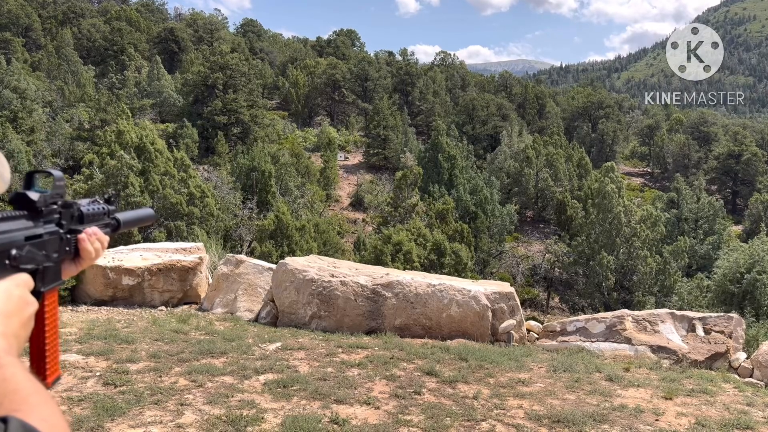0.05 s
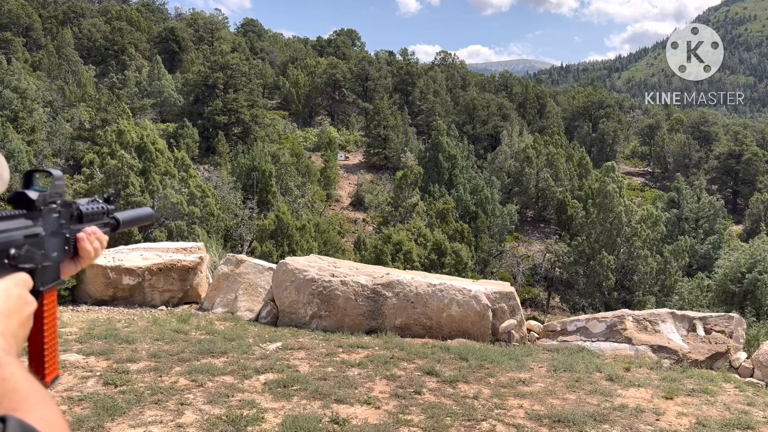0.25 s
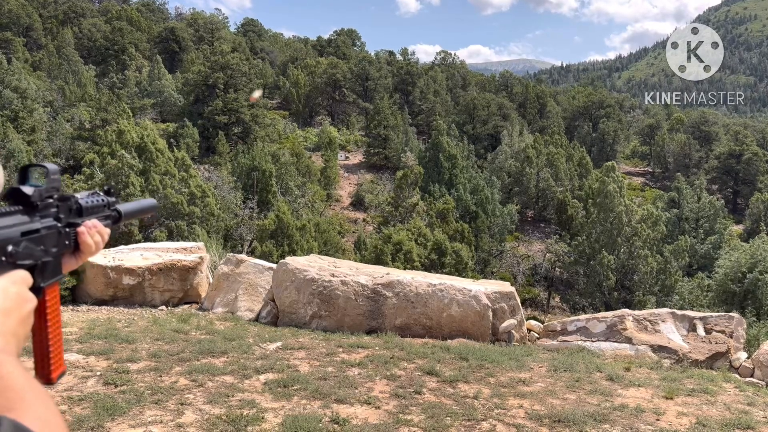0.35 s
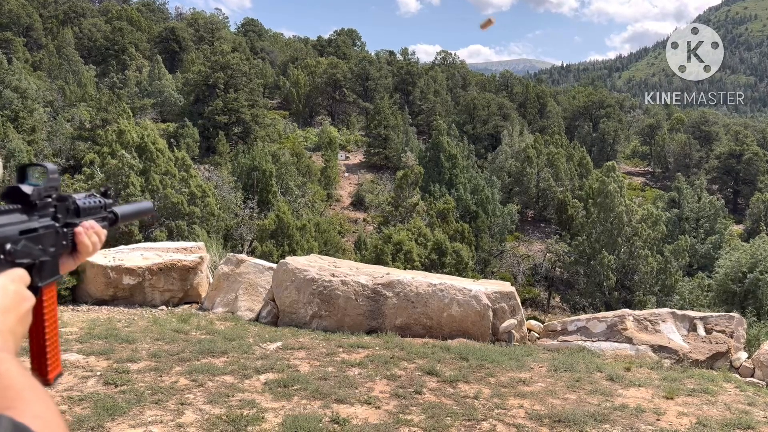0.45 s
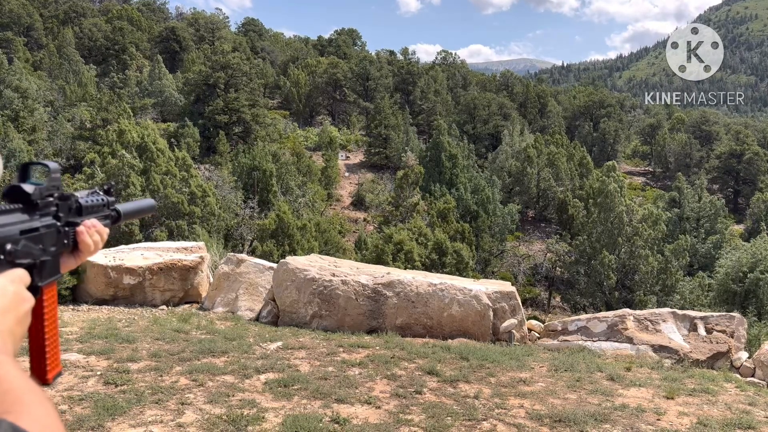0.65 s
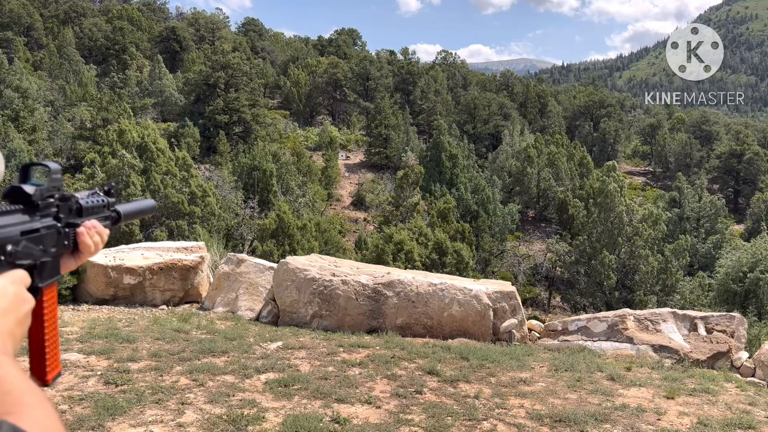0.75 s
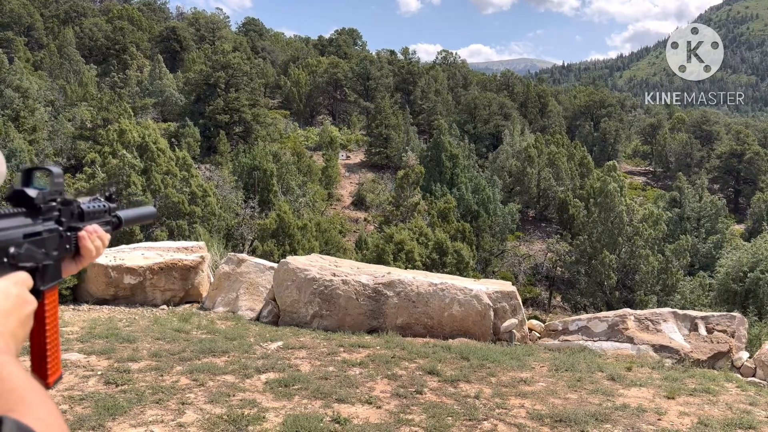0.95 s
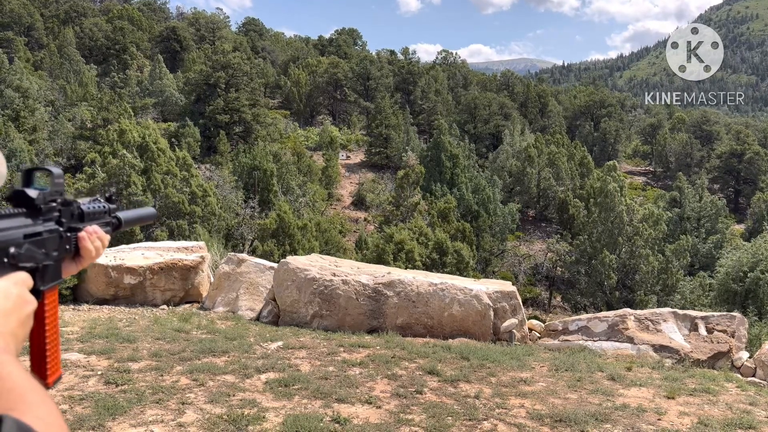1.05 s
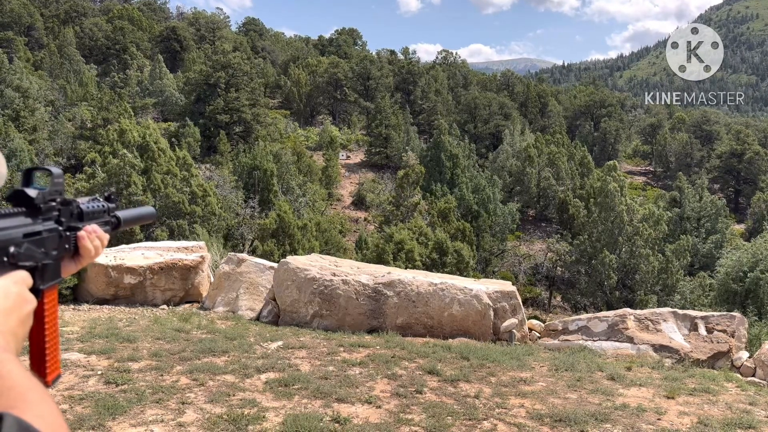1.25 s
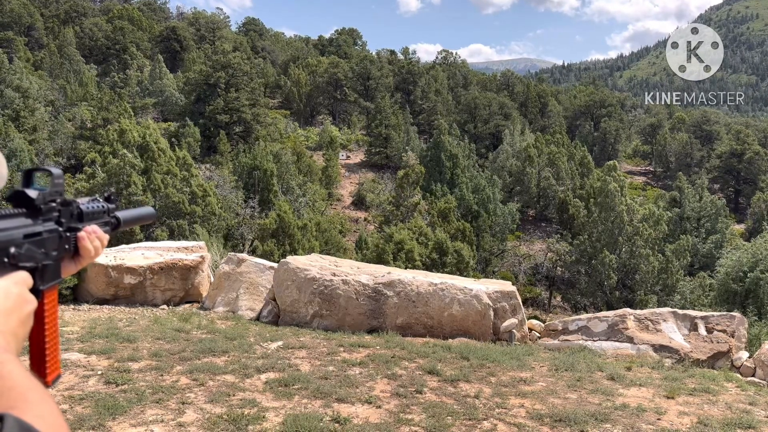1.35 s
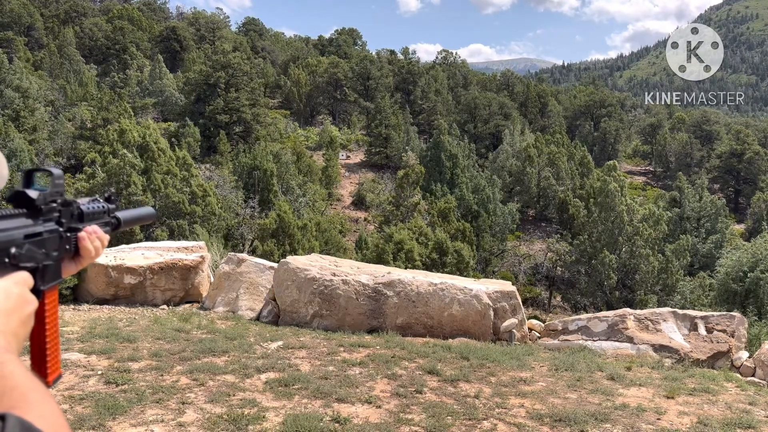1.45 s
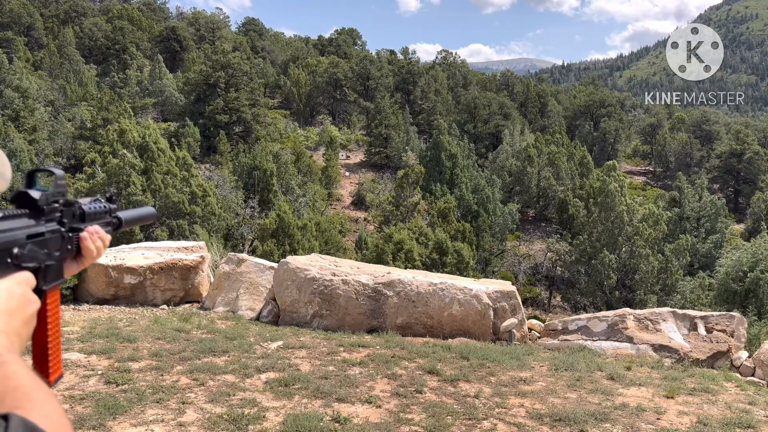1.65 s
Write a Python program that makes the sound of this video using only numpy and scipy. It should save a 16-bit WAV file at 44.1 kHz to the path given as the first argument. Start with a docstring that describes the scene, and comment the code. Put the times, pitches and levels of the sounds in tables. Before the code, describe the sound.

A suppressed carbine fires once close to the microphone, a short muffled crack with bolt clatter and low thump; a soft echo fades, a dull knock follows, the case faintly tinkles, then the action clicks sharply.

```python
"""Wind buffets the microphone, then a suppressed carbine fires one shot on an open range facing a wooded slope.
The report, a shaped noise burst with venting gas, is wrapped in the action's clatter: cracks plus ringing modes.
Sine puffs that sink in pitch thump the microphone; ground, slope and valley answer with decaying diffuse noise.
Dull knocks follow; the spent case bounces and tinkles as two beating modes, and the action gives a sharp click.
Air noise, rustling trees and a faint hiss of insects continue beneath."""
import sys
import numpy as np
from scipy import signal
from scipy.fft import rfft, irfft
from scipy.io import wavfile
from scipy.ndimage import uniform_filter1d

SR = 44100
rng = np.random.default_rng(int(sys.argv[2]) if len(sys.argv) > 2 else 0)


def materialize(psi):
    """Save the field psi as 16-bit PCM at rate SR to the path in sys.argv[1].

    A 1-D psi becomes a single channel; in a 2-D psi each row is a channel.
    """
    bounded = np.clip(np.atleast_2d(psi).T, -1, 1)
    quanta = np.round(bounded * 32767).astype(np.int16)
    wavfile.write(sys.argv[1], SR, quanta)


N = 74970   # length in samples

# Every *_SPECTRUM gives the relative spectral level of a noise. Columns: f/Hz, level/dB
# Every *_MODES lists resonances. Columns: f/Hz, relative level/dB, T60/s

# Gusts on the microphone. Columns: peak t/s, half length/s, level/dB, upper edge f/Hz
GUSTS = [(.024, .012, -33, 310), (.082, .014, -30, 230), (.122, .022, -37, 250), (.194, .007, -39, 290),
         (.46, .03, -41, 75), (.535, .035, -35, 72), (.626, .006, -47, 250), (.644, .012, -31, 110),
         (.674, .012, -40, 175), (.772, .014, -35, 235), (.8, .022, -29, 145), (1.0, .035, -44, 120),
         (1.077, .01, -27.5, 165), (1.145, .012, -46, 150), (1.235, .04, -43, 115), (1.35, .04, -49, 100),
         (1.53, .012, -45, 100), (1.59, .025, -47, 100)]
# Steady air. Columns: f/Hz, level/dB
AIR_SPECTRUM = [(15, -35), (25, -5), (54, 0), (88, -1), (121, -6), (219, -23), (558, -28), (1420, -39),
                (2020, -41), (2780, -54), (3930, -57), (4620, -52), (15000, -76)]
# Rustle of the trees. Columns: f/Hz, level/dB
TREES_SPECTRUM = [(300, 0), (600, -1), (1200, -7), (2000, -12), (2800, -26), (8000, -46), (15000, -50)]

# Echoes of ground and rocks nearby, of the slope, and of the valley.
# Columns: delay after the shot/s, level/dB, rise/s, hold/s, T60 in the bass/s
NEAR_ECHO = (.012, -45.5, .02, .02, .46)
SLOPE_ECHO = (.14, -54.5, .15, .025, .52)
FAR_ECHO = (.32, -64, .06, .06, 1.6)
# Nearby echo of the click. Columns: delay after the click/s, level/dB, rise/s, hold/s, T60 in the bass/s
CLICK_ECHO = (.004, -55, .004, .035, .31)
# Colours of the four echoes. Columns: f/Hz, level/dB
NEAR_SPECTRUM = [(290, -44), (500, -14), (704, -13), (949, -8), (1390, -13), (2290, -6), (3370, -15),
                 (5010, -1), (5780, -9), (8610, -16), (9930, -25), (10800, -20), (15000, -24)]
SLOPE_SPECTRUM = [(290, -60), (500, -30), (585, -10), (896, 0), (1050, -13), (1990, -8), (2390, -11),
                  (5160, -9), (8990, -29), (9380, -49), (10800, -25), (15000, -31)]
FAR_SPECTRUM = [(410, -42), (700, -12), (882, 0), (1080, -15), (1230, -5), (1780, -17), (2000, -6),
                (2590, -14), (5110, -15), (7130, -38), (15000, -60)]
CLICK_ECHO_SPECTRUM = [(350, -43), (600, -13), (863, -14), (961, 0), (1280, -20), (2340, -8), (2570, -17),
                       (2820, -13), (7860, -22), (15000, -34)]

# Dull knocks, likely the bullet striking downrange. Columns: t/s, level/dB, T60/s
KNOCKS = [(.3843, -53, .02), (.5528, -36, .022), (.6075, -54, .02)]
# Colour of the knocks. Columns: f/Hz, level/dB
KNOCK_SPECTRUM = [(210, -30), (350, 0), (1770, -6), (2580, -16), (4610, -11), (6220, -30), (7630, -23),
                  (12400, -45), (15000, -30)]
# The case bouncing on the ground. Columns: t/s, level/dB, T60/s
BOUNCES = [(1.1365, -50.5, .022), (1.1405, -53, .02), (1.513, -58, .016), (1.5184, -59, .018)]
# Colour of the bounces. Columns: f/Hz, level/dB
BOUNCE_SPECTRUM = [(400, 0), (1200, -5), (2100, 4), (3100, -19), (4500, -10), (6000, -24), (10000, -22),
                   (12000, -11), (14000, -6), (15500, -14)]
# Touches that make the brass case ring. Columns: t/s, level/dB
CASE_TOUCHES = [(1.1398, -47), (1.5404, -60.5)]
# Modes of the case. Columns: f/Hz, level/dB, T60/s
CASE_MODES = [(11650, -4, .25), (11740, 0, .23)]

# Click of the action and its rebounds. Columns: t/s, crack level/dB, crack T60/s, ring level/dB
CLICKS = [(1.3333, -22, .01, -42), (1.3343, -22, .008, -26), (1.3402, -37, .016, -41),
          (1.3725, -51, .03, -57), (1.389, -64, .03, -57)]
# Colour of the click's cracks. Columns: f/Hz, level/dB
CLICK_SPECTRUM = [(700, -18), (1400, -15), (2100, -2), (2900, -11), (3600, 1), (4500, 1), (6100, -12),
                  (7800, -4), (10700, -8), (12300, -22), (13600, -8), (15500, -21)]
# Modes of the click. Columns: f/Hz, level/dB, T60/s
CLICK_MODES = [(738, -13, .05), (982, 2, .065), (1926, -6, .035), (2396, -9, .1), (3200, -40, .7),
               (3500, 5, .014), (4400, 7, .012), (7790, -5, .035), (8130, -4, .035), (10416, -13, .045),
               (14400, -12, .025)]

# Puffs of air. Columns: t/s, level/dB, start f/Hz, end f/Hz, glide/s, rise/s, hold/s, T60/s
PUFFS = [(.235, -18, 330, 120, .012, .004, .005, .035), (.2495, -9, 70, 50, .02, .012, .008, .09),
         (.2568, -24, 560, 170, .005, .001, .002, .025), (.3235, -16, 52, 46.5, .015, .02, .036, .06),
         (.3845, -15.5, 470, 48, .005, .003, .014, .06)]

# Steel on steel: hammer, unlocking, rear stop, bolt closing, bolt settling.
# Columns: t/s, crack level/dB, crack T60/s, ring level/dB
ACTION = [(.2328, -36, .03, -33), (.2372, -27, .02, -19), (.2445, -26, .01, -10.2), (.2562, -27, .022, -36),
          (.2838, -16.5, .018, -30), (.2885, -34, .035, -35)]
# Colour of the steel cracks and of the gas. Columns: f/Hz, level/dB
STEEL_SPECTRUM = [(180, -30), (300, 0), (1020, -8), (1670, -18), (2040, 1), (2690, -15), (5570, -8),
                  (6790, -14), (8420, -11), (10800, -19), (12100, -28), (14000, -13), (15500, -27)]
# Modes of bolt and receiver. Columns: f/Hz, level/dB, T60/s
RECEIVER_MODES = [(443, -11, .05), (535, -9, .05), (985, -11, .035), (1704, -17, .035), (2160, -12, .06),
                  (4506, -14, .03), (4930, -8, .035), (5130, -13, .03), (5370, -2.5, .03), (6200, -7, .025),
                  (10440, -20, .03), (13800, -18, .025)]
# Colour of the muffled blast. Columns: f/Hz, level/dB
SHOT_SPECTRUM = [(88, -31), (150, -1), (1110, -4), (1660, -9), (2140, -3), (2760, -20), (5330, -1),
                 (7270, -20), (8490, -12), (11800, -18), (12800, -25), (14100, -13), (15500, -23)]

AIR_DB, TREES_DB = -55, -69
INSECTS_HZ, INSECTS_WIDTH_HZ, INSECTS_DB = 4750, 260, -89.5
WIND_LOW_HZ = 48   # lower edge of the gust rumble
# Correlation between left and right, from 0 (independent) to 1 (identical)
AIR_LIKENESS, WIND_LIKENESS, NEAR_LIKENESS, FAR_LIKENESS = .7, .8, .15, .2
# Frequency at which an echo dies twice as fast as in the bass
NEAR_LOSS_HZ, SLOPE_LOSS_HZ, FAR_LOSS_HZ = 60000, 8000, 4500
CRACK_RISE_S, CRACK_HOLD_S = .0004, .0015
# Arrival lag of a ring at the second microphone port
CASE_LAG_S, CLICK_LAG_S, RECEIVER_LAG_S = .00002, .00031, .00022
CLICK_PAN_DB, RECEIVER_PAN_DB = .2, 1.5   # first port raised, second lowered by this
SHOT_S, SHOT_DB, SHOT_RISE_S, SHOT_HOLD_S, SHOT_T60_S = .2411, -10.2, .0005, .003, .014
GAS_DELAY_S, GAS_DB, GAS_RISE_S, GAS_HOLD_S, GAS_T60_S = .013, -33.5, .003, .036, .07
CLIP_LEVEL, CUTOFF_HZ = .92, 16000


def amp(db):
    """Level to amplitude: 20 dB is a factor of ten."""
    return 10 ** (np.asarray(db) / 20)


def clock():
    """Sampling principle: sample n stands at time n / SR, in seconds."""
    return np.arange(N) / SR


def bin_frequencies():
    """Frequency of each Fourier bin in Hz, kept above zero for logarithms."""
    return np.maximum(np.arange(N // 2 + 1) * SR / N, 1)


def decay(t, t60):
    """Exponential damping: the amplitude falls by 60 dB in t60 seconds."""
    return np.exp(-np.log(1000) * t / t60)


def envelope(start, rise, hold, t60):
    """Excitation then damping: a straight rise, a hold and an exponential decay."""
    t = clock() - start
    return np.clip(t / rise, 0, 1) * decay(np.maximum(t - rise - hold, 0), t60)


def noise(gain_at, likeness):
    """Spectral filtering: stereo noise of rms 1, correlated by mixing a common and an opposed part."""
    white = rng.standard_normal((2, N))
    common, opposed = irfft(rfft(white) * gain_at(bin_frequencies()), N)
    opposed_pair = opposed * np.array([[1], [-1]])
    stereo = np.sqrt(1 + likeness) * common + np.sqrt(1 - likeness) * opposed_pair
    return stereo / np.sqrt(np.mean(stereo ** 2))


def coloured(spectrum, likeness):
    """Spectral colouring: level interpolated over log frequency, with bass cut below the first point."""
    points_hz, points_db = np.transpose(spectrum)

    def gain_at(hz):
        level_db = np.interp(np.log(hz), np.log(points_hz), points_db)
        return amp(level_db) * np.minimum(hz / points_hz[0], 1) ** 2

    return noise(gain_at, likeness)


def evened(x, size):
    """Power normalisation: noise divided by its short-term rms over a window of samples."""
    power = uniform_filter1d(np.mean(x ** 2, axis=0), size)
    return x / np.sqrt(power + 1e-9)


def ring(hits, modes, lag=0):
    """Modal synthesis: each hit (t/s, level/dB) excites all modes as damped sines."""
    out = np.zeros(N + SR)
    for s, db in hits:
        first = int((s + lag) * SR)
        for k, (hz, mode_db, t60) in enumerate(modes):
            t = np.arange(int(min(t60, .5) * 2 * SR)) / SR
            strength = amp(db + mode_db + rng.normal())   # 1 dB random spread
            polarity = (-1) ** k
            mode = np.sin(2 * np.pi * hz * t) * decay(t, t60)
            out[first:first + len(t)] += polarity * strength * mode
    return out[:N]


def cracks(rows, spectrum):
    """Impulsive contact: a very short noise burst for each row (t/s, level/dB, T60/s)."""
    level = sum(amp(db) * envelope(s, CRACK_RISE_S, CRACK_HOLD_S, t60) for s, db, t60 in rows)
    return level * evened(coloured(spectrum, NEAR_LIKENESS), size=90)


def metal(rows, spectrum, modes, pan_db, lag, lowest_hz):
    """Impact and resonance: cracks plus modes reaching two ports apart; small parts radiate no bass."""
    hits = [(s, ring_db) for s, _, _, ring_db in rows]
    first_port = amp(pan_db) * ring(hits, modes)
    second_port = amp(-pan_db) * ring(hits, modes, lag)
    contacts = cracks([row[:3] for row in rows], spectrum)
    high_pass = signal.butter(4, lowest_hz, "high", fs=SR, output="sos")
    return signal.sosfilt(high_pass, contacts + np.array([first_port, second_port]))


def echo(source_s, shape, spectrum, loss_hz):
    """Diffuse reverberation: noise split into bands, the treble decaying fastest."""
    delay, db, rise, hold, t60 = shape
    bins = rfft(coloured(spectrum, FAR_LIKENESS))
    centres = np.geomspace(500, 16000, 8)   # band centres in Hz
    log_hz = np.log(bin_frequencies())
    out = 0
    for hz, pick in zip(centres, np.eye(len(centres))):
        band_gain = np.interp(log_hz, np.log(centres), pick)   # overlapping triangles
        band = irfft(bins * band_gain, N)
        out = out + band * envelope(source_s + delay, rise, hold, t60 / (1 + hz / loss_hz))
    return amp(db) * out


def wind():
    """Turbulent pressure at the microphone: short lumps of band-limited rumble over steady air."""
    out = amp(AIR_DB) * coloured(AIR_SPECTRUM, AIR_LIKENESS)
    for s, half, db, top_hz in GUSTS:

        def rumble_gain(hz):
            return 1 / np.sqrt((1 + (WIND_LOW_HZ / hz) ** 6) * (1 + (hz / top_hz) ** 8))

        rumble = evened(noise(rumble_gain, WIND_LIKENESS), size=900)
        swell = np.exp(-.5 * ((clock() - s) / half) ** 2)
        out = out + amp(db) * swell * rumble
    return out


def trees():
    """Superposition of many small rustles: steady coloured noise."""
    return amp(TREES_DB) * coloured(TREES_SPECTRUM, FAR_LIKENESS)


def insects():
    """Narrow-band radiation: a faint steady hiss with a bell-shaped spectrum."""
    def gain_at(hz):
        return np.exp(-.5 * ((hz - INSECTS_HZ) / INSECTS_WIDTH_HZ) ** 2)

    return amp(INSECTS_DB) * noise(gain_at, FAR_LIKENESS)


def landscape():
    """Delayed scattering: the shot returns from ground, slope and valley, the click only from nearby."""
    near = echo(SHOT_S, NEAR_ECHO, NEAR_SPECTRUM, NEAR_LOSS_HZ)
    slope = echo(SHOT_S, SLOPE_ECHO, SLOPE_SPECTRUM, SLOPE_LOSS_HZ)
    valley = echo(SHOT_S, FAR_ECHO, FAR_SPECTRUM, FAR_LOSS_HZ)
    first_click_s = CLICKS[0][0]
    click = echo(first_click_s, CLICK_ECHO, CLICK_ECHO_SPECTRUM, NEAR_LOSS_HZ)
    return near + slope + valley + click


def knocks():
    """Damped impact: dull noise bursts, likely the bullet striking downrange."""
    return cracks(KNOCKS, KNOCK_SPECTRUM)


def spent_case():
    """Impact and beating: the case bounces as noise bursts, and two close brass modes beat as they ring."""
    first_port = ring(CASE_TOUCHES, CASE_MODES)
    second_port = ring(CASE_TOUCHES, CASE_MODES, CASE_LAG_S)
    return cracks(BOUNCES, BOUNCE_SPECTRUM) + np.array([first_port, second_port])


def action_click():
    """Impact with rebounds: the action's sharp click sets short modes ringing."""
    return metal(CLICKS, CLICK_SPECTRUM, CLICK_MODES, CLICK_PAN_DB, CLICK_LAG_S, lowest_hz=650)


def puffs():
    """Bulk air flow: damped sines of sinking frequency thump both ports alike."""
    out = np.zeros(N)
    for s, db, start_hz, end_hz, glide, rise, hold, t60 in PUFFS:
        t = np.maximum(clock() - s, 0)
        # Phase is the integral of a frequency relaxing from start to end
        cycles = end_hz * t + (start_hz - end_hz) * glide * (1 - np.exp(-t / glide))
        out -= amp(db) * envelope(s, rise, hold, t60) * np.sin(2 * np.pi * cycles)
    return out


def action_clatter():
    """Successive steel impacts: each cracks and excites the modes of bolt and receiver."""
    return metal(ACTION, STEEL_SPECTRUM, RECEIVER_MODES, RECEIVER_PAN_DB, RECEIVER_LAG_S, lowest_hz=200)


def report():
    """Rapid gas expansion: a muffled blast of noise, then the hiss of gas venting as the bolt travels."""
    blast_noise = evened(coloured(SHOT_SPECTRUM, NEAR_LIKENESS), size=90)
    blast = amp(SHOT_DB) * envelope(SHOT_S, SHOT_RISE_S, SHOT_HOLD_S, SHOT_T60_S) * blast_noise
    gas_level = amp(GAS_DB) * envelope(SHOT_S + GAS_DELAY_S, GAS_RISE_S, GAS_HOLD_S, GAS_T60_S)
    return blast + gas_level * coloured(STEEL_SPECTRUM, NEAR_LIKENESS)


def scene():
    """Linear superposition of the outdoors, echoes, small impacts and the gun."""
    outdoors = wind() + trees() + insects()
    small_impacts = knocks() + spent_case() + action_click()
    gun = puffs() + action_clatter() + report()
    return outdoors + landscape() + small_impacts + gun


def record(dry):
    """Saturation and band limiting: the highest peaks clip, then the top of the spectrum is cut."""
    low_pass = signal.cheby2(14, 70, CUTOFF_HZ + 600, fs=SR, output="sos")   # 70 dB down at the stopband edge
    return signal.sosfilt(low_pass, np.clip(dry, -CLIP_LEVEL, CLIP_LEVEL))


dry = scene()
out = record(dry)
materialize(out)
```